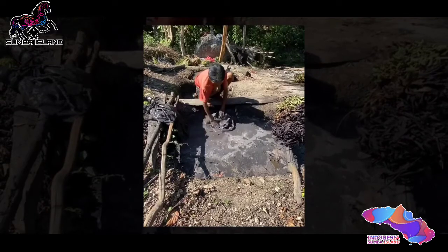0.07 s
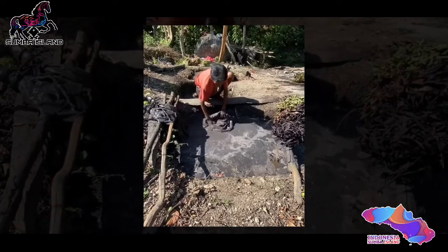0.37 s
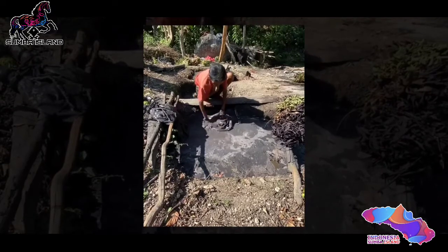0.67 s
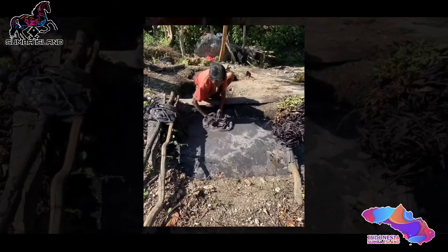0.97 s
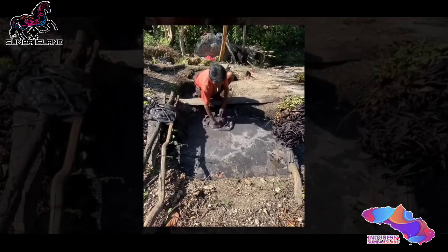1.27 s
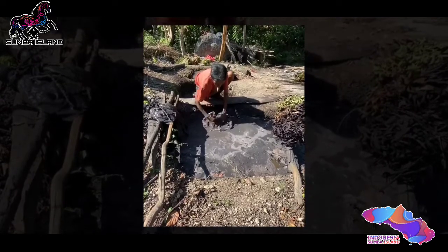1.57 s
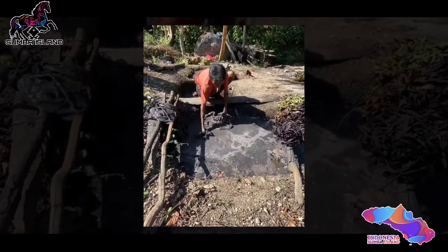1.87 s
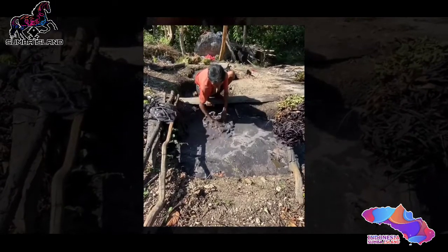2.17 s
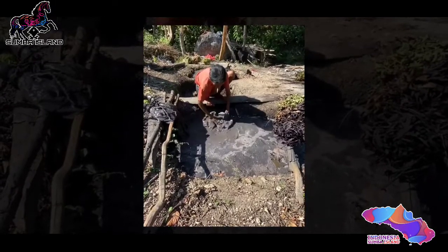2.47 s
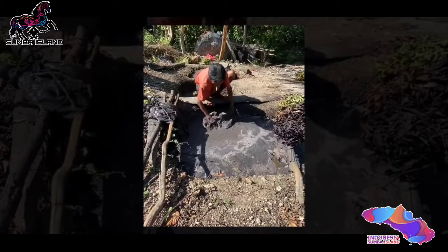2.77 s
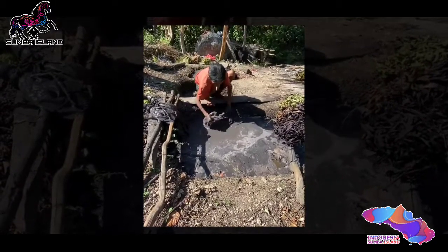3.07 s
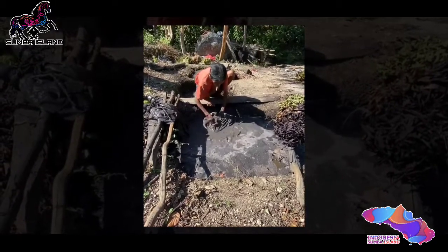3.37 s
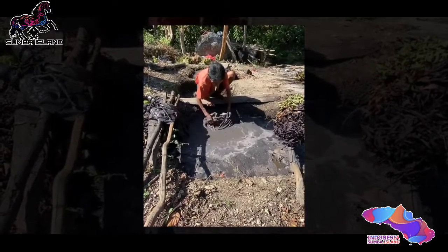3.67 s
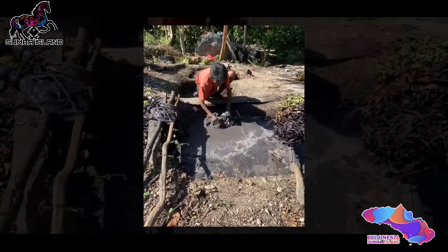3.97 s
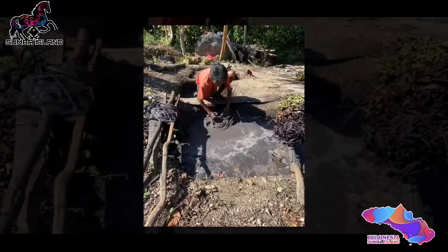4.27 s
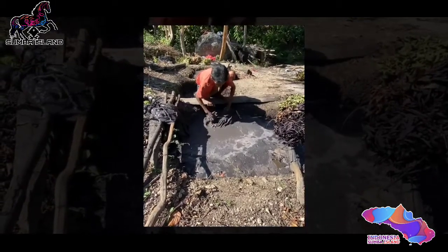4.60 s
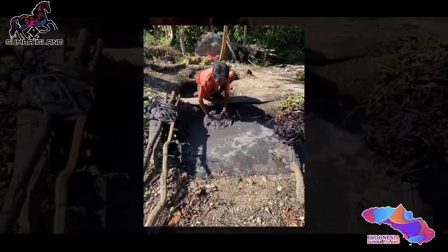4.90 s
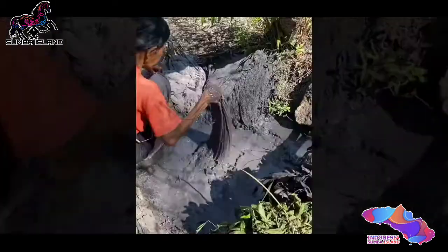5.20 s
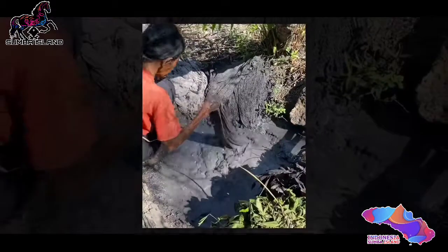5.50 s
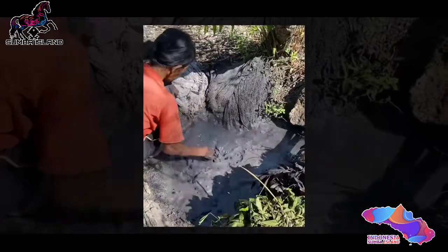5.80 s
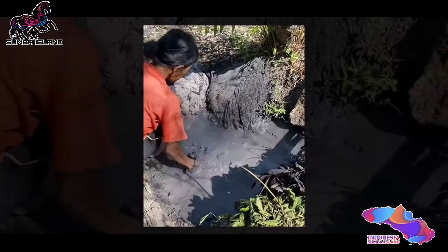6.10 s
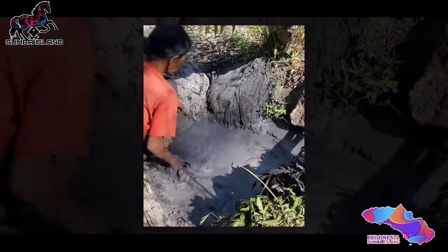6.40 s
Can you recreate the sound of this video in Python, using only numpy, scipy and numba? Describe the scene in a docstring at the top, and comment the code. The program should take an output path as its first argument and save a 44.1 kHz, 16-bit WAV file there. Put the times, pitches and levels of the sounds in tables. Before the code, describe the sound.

Soft, irregular squelching and trickling come from a short distance as hands squeeze yarn in muddy water, against a faint outdoor hush. Drops plink, a small air pocket gulps, and one flat, sharp splash stands out. After a lull with scattered drips, the kneading is suddenly right by the microphone, with heavier churning, splashes and low gulps as the yarn is dragged under.

```python
"""A hank of yarn is kneaded in a muddy pool outdoors, first a few metres off. Each squeeze frees
small bubbles and a fine spray; drops plink, wet strands slap, the banks add a short scatter.
At 2.2 s one air pocket gulps; at 3.2 s the hank smacks flat on the water.
From 5.3 s the kneading is close by: the arm pushes waves and big air pockets gulp as the yarn
is dragged under."""
import sys
import numpy as np
from scipy import signal
from scipy.fft import rfft, irfft
from scipy.io import wavfile
from scipy.ndimage import uniform_filter1d
from numba import njit

SR = 44100
rng = np.random.default_rng(int(sys.argv[2]) if len(sys.argv) > 2 else 0)


def output_pcm(signal):
    """Save a mono or channel-first signal as 16-bit PCM at the path in sys.argv[1].

    Samples are clipped to [-1, 1] before scaling.
    """
    pcm = np.clip(np.atleast_2d(signal).T, -1, 1) * 32767
    wavfile.write(sys.argv[1], SR, np.round(pcm).astype(np.int16))


N = 284445
TIME_S = np.arange(N) / SR
BINS_HZ = np.fft.rfftfreq(N, 1 / SR)
SIDE_SIGN = np.array([[1], [-1]])
CLOSE_S = 5.286

# Spectrum of a wet impact: freq_hz, gain_db
IMPACT_SPECTRUM = [(150, -22), (400, -9.5), (850, -6.5), (1400, 1.5), (3300, 5.5), (4700, -2.5),
                   (5600, 2.5), (8500, -6), (10500, -7.5), (15500, -18.5)]


def undb(db):
    """Decibels to gain."""
    return 10 ** (np.asarray(db) / 20)


def unit(x):
    """Scale to rms 1."""
    return x / np.sqrt(np.mean(x ** 2) + 1e-20)


def even(x, window_samples=2600):
    """Hold the running rms near 1."""
    return x / np.sqrt(uniform_filter1d(np.mean(x ** 2, axis=0), window_samples) + 1e-6 * np.mean(x ** 2))


def across(table, hz, column=1):
    """Interpolate a table column over log frequency."""
    rows = np.array(table)
    return np.interp(np.log(hz + 1), np.log(rows[:, 0]), rows[:, column])


def colour(x, spectrum):
    """Filter by rows of freq_hz, gain_db."""
    return irfft(rfft(x) * undb(across(spectrum, BINS_HZ)), N)


def swell(at_s, hold_s, rise_s, fall_s):
    """Exponential envelope: reaches 1 at at_s, holds, decays."""
    return np.exp(np.minimum(0, np.minimum((TIME_S - at_s) / rise_s, (at_s + hold_s - TIME_S) / fall_s)))


@njit
def ring(start_s, hz, size, cycles, skew_rad, rise, onset):
    """Bubbles: sines that swell, fall 60 dB over their cycles and go sharp by the fraction rise."""
    out = np.zeros((2, N))
    for k in range(len(start_s)):
        first, length, phase = int(start_s[k] * SR), int(cycles[k] / hz[k] * SR) + 2, 0.
        for i in range(max(0, -first), min(length, N - first)):
            age = i / length
            phase += 2 * np.pi * min(hz[k] * (1 + rise * age) / SR, .45)
            swing = size[k] * np.exp(-6.9 * age) * (1 - np.exp(-(age / onset) ** 2))
            out[0, first + i] += swing * np.sin(phase + skew_rad[k])
            out[1, first + i] += swing * np.sin(phase - skew_rad[k])
    return out


def cloud(per_s, low_hz, high_hz, cycles, spread_db, skew_rad, rise):
    """Steady swarm of tiny bubbles; cycles is the mean at 2 kHz, smaller bubbles ring for more."""
    when, pitch, strength, life, side = rng.random((int(per_s * N / SR), 5)).T
    hz = (np.sqrt(low_hz) + pitch * (np.sqrt(high_hz) - np.sqrt(low_hz))) ** 2
    size = undb(-spread_db * np.log(strength + 0.038)) * np.sqrt(hz)
    ring_cycles = cycles * (.5 + life) * np.sqrt(hz / 2000)
    return unit(ring(when * N / SR, hz, size, ring_cycles, skew_rad * (2 * side - 1), rise, 1 / 6))


def outdoors(level_db=-54.5, side_db=-3):
    """Faint open air and foliage, narrower in the bass."""
    # Ambient spectrum: freq_hz, gain_db
    air_spectrum = [(15, -45), (25, -23), (59, 1.5), (193, 0.5), (349, -4.5), (582, -6), (826, -5.5),
                    (1270, -11.5), (1710, -7.5), (2490, -12.5), (3930, -6), (4620, -15), (5280, -9.5),
                    (10600, -18), (15500, -23)]
    mid, side = colour(rng.standard_normal((2, N)), air_spectrum)
    side = colour(side, [(60, -2), (300, -6.5), (700, 6.5), (1600, 0.5), (2800, 3.5), (6000, 0)])
    return (mid + side * undb(side_db) * SIDE_SIGN) / np.std(mid) * undb(level_db)


def banks(x, wet_db, t60_s):
    """Muddy banks and bushes add a short, dull tail to x."""
    age_s = np.arange(9000) / SR
    tail = rng.standard_normal((2, len(age_s))) * undb(-60 * age_s / t60_s) * (age_s > .003)
    tail = signal.sosfilt(signal.butter(1, 6000, fs=SR, output="sos"), tail)
    tail /= np.sqrt(np.sum(tail ** 2, axis=1, keepdims=True))
    return x + undb(wet_db) * signal.fftconvolve(x, tail, axes=1)[:, :N]


def spatter(spray, gain_db=-59, follow=0.58, ref_db=-55):
    """Mud flecks tick on the surface, harder while the yarn sprays."""
    ticks = cloud(per_s=63, low_hz=1200, high_hz=11000, cycles=5.3, spread_db=3, skew_rad=0.81, rise=0.11)
    return colour(ticks, IMPACT_SPECTRUM) * undb(gain_db) * (spray / undb(ref_db)) ** follow


def waves(rise_s=0.041, fall_s=0.049):
    """Water pushed by the arm rumbles, heard only close by."""
    # Wave crests: peak_s, level_db
    crests = [(5.384, -21), (5.53, -26.5), (5.648, -25.5), (5.8, -28.5), (5.918, -25), (6.055, -36.5),
              (6.245, -29)]
    spectrum = [(15, -50), (30, -9.5), (60, 5), (110, -2), (200, -11.5), (350, -24.5), (900, -40)]
    mid, side = colour(rng.standard_normal((2, N)), spectrum)
    rumble = even(mid + side * SIDE_SIGN / 9, window_samples=1800)
    heave = np.max([swell(peak_s, 0, rise_s, fall_s) * undb(db) for peak_s, db in crests], axis=0)
    return rumble * heave * (TIME_S > CLOSE_S)


def gulps(gain_db=10, cycles=7., rise=0.42):
    """Big air pockets break loose and ring for a few slow swings."""
    # Air pockets: time_s, pitch_hz, relative_db
    pockets = [(2.242, 200, -28.5), (5.35, 164, -17.5), (5.368, 237, -15), (5.379, 87, -23),
               (5.382, 370, -15), (5.634, 61, -24), (5.67, 207, -18), (5.822, 177, -24), (5.904, 78, -24),
               (6.24, 109, -22), (6.411, 150, -22)]
    time_s, hz, db = np.transpose(pockets)
    start_s = time_s - 0.32 / hz
    return ring(start_s, hz, undb(db + gain_db), np.full(len(hz), cycles), np.zeros(len(hz)), rise, 1 / 8)


def drips(churn, per_s=14, low_hz=600, high_hz=4500, base_db=-41, spread_db=2.5, follow=0.44, ref_db=-48):
    """Faint random drips, louder with the churn: rows of time_s, pitch_hz, relative_db."""
    when, pitch, strength = rng.random((int(per_s * N / SR), 3)).T
    churn_db = 20 * np.log10(churn[(when * N).astype(int)])
    db = base_db + spread_db * (2 * strength - 1) + follow * (churn_db - ref_db)
    return np.transpose([when * N / SR, low_hz * (high_hz / low_hz) ** pitch, db])


def drops(churn, gain_db=18, rise=0.19, onset=0.3, splits=2, split_db=-5, scatter_s=0.00248):
    """Each drop traps a bubble that chirps upward and splits off weaker ones."""
    # Distinct drops: time_s, pitch_hz, relative_db
    plinks = [(.065, 2900, -36), (.184, 1840, -34), (.517, 820, -37), (.594, 1470, -33), (.63, 338, -37.5),
              (.676, 1950, -27.5), (.808, 3080, -21), (.909, 2490, -30), (.981, 1870, -35),
              (1.205, 458, -29.5), (1.465, 2680, -38.5), (1.972, 1085, -32), (2.078, 6330, -29),
              (2.112, 3930, -23.5), (2.13, 2800, -23.5), (2.246, 2470, -18), (2.301, 1430, -30),
              (2.393, 3110, -26), (2.709, 1720, -26.5), (2.836, 2750, -28.5), (2.929, 1370, -29),
              (3.068, 2830, -31), (3.114, 1480, -32), (3.194, 1820, -23), (4.21, 2580, -32),
              (4.281, 3030, -35), (4.314, 2290, -31.5), (4.486, 3700, -35), (4.67, 5940, -26.5),
              (4.697, 1610, -29.5), (4.768, 3090, -24), (4.785, 4030, -25), (4.816, 1430, -23.5),
              (4.841, 1690, -27.5), (5.452, 880, -17.5), (5.483, 2000, -18), (5.501, 1470, -15),
              (5.608, 1585, -14.5), (5.916, 2200, -25), (6.104, 1480, -23), (6.22, 1720, -32),
              (6.338, 1360, -26.5)]
    time_s, hz, db = np.vstack([plinks, drips(churn)]).T
    cycles = 17 * np.sqrt(hz / 2000)
    start_s = time_s - cycles / hz / 10
    size = undb(db + gain_db)
    lag, detune, skew = rng.standard_normal((len(hz), splits + 1, 3)).T
    out = ring(start_s, hz, size, cycles, 0.071 * skew[0], rise, onset)
    for k in range(1, splits + 1):
        split_s = start_s + scatter_s * lag[k]
        split_hz = hz * 2 ** (detune[k] / 3)
        out += ring(split_s, split_hz, size * undb(split_db), cycles, 0.14 * skew[k], rise, onset)
    return out


def slaps(swell_s=0.0023, gain_db=0.5, length=8192, lead_samples=700):
    """Wet strands hit the surface: a quick swell of tiny bursting bubbles."""
    # Slaps and squirts: peak_s, relative_db, decay_s, tilt_db_per_octave
    hits = [(.007, -31, 0.0039, -2), (0.403, -34, 0.0056, 2.5), (.561, -36, 0.0097, 0),
            (0.655, -35.5, 0.0031, 4), (0.753, -38.5, 0.0083, 6), (1.2, -37, 0.015, -6.5),
            (1.313, -37.5, 0.0055, -.5), (1.574, -39.5, 0.016, -5), (1.73, -26.5, 0.0016, 7.5),
            (1.839, -37.5, 0.0093, -3.5), (1.872, -38.5, 0.019, 2), (2.152, -31.5, 0.0065, -0.5),
            (2.182, -24, .0018, -2), (2.201, -25.5, .0043, -2), (2.213, -27, 0.0024, -2),
            (2.23, -34.5, 0.014, 5), (2.382, -45, .0018, -2.5), (2.493, -26, 0.0017, 1.5),
            (2.645, -30.5, 0.0075, 3), (3.526, -43, .0044, -8), (3.918, -35.5, 0.0012, -3.5),
            (3.932, -30, .0015, -5.5), (4.238, -44, 0.0041, 1), (4.697, -30.5, 0.0016, -5.5),
            (4.77, -32, .0064, 1.5), (4.877, -37.5, 0.013, 0.5), (4.93, -35.5, 0.0056, 1.5),
            (4.976, -33.5, 0.011, -4.5), (5.515, -23.5, 0.0032, 14.5), (5.626, -22.5, 0.014, 1.5),
            (5.825, -25.5, 0.0031, 2.5), (5.97, -31, 0.014, 3), (6.121, -29.5, 0.0026, 2),
            (6.326, -30, 0.0017, 4.5)]
    crackle = cloud(per_s=6000, low_hz=200, high_hz=15500, cycles=6, spread_db=3, skew_rad=.7, rise=.2)
    out = np.zeros((2, N + 2 * length))
    age_s = (np.arange(length) - lead_samples) / SR
    hz = np.fft.rfftfreq(length, 1 / SR)
    for peak_s, db, decay_s, tilt in hits:
        cut = int(rng.random() * (N - length))
        envelope = np.exp(np.minimum(age_s / swell_s, -age_s / decay_s))
        spectrum_db = across(IMPACT_SPECTRUM, hz) + tilt * np.log2(hz / 2000 + 0.037)
        burst = irfft(rfft(crackle[:, cut:cut + length] * envelope) * undb(spectrum_db))
        first = int(peak_s * SR) + length - lead_samples
        out[:, first:first + length] += unit(burst) * np.sqrt(np.mean(envelope ** 2)) * undb(db + gain_db)
    return out[:, length:length + N]


def plunge(at_s=3.218, level_db=-13, snap=7, width=0.46):
    """The hank smacks flat on the water: a snap in a burst of spray rings the trapped air."""
    # Trapped-air resonances: freq_hz, width_hz, gain_db
    modes = [(534, 53, 1), (840, 150, 9), (1160, 510, 8), (2020, 310, 6), (2550, 180, 4.5),
             (3250, 450, 6.5), (5370, 470, 5.5), (6800, 1400, 1.5), (9860, 810, 7.5), (11300, 630, 1),
             (14000, 2000, -21)]
    envelope = swell(at_s, hold_s=0, rise_s=0.003, fall_s=0.005)
    mid, side = rng.standard_normal((2, N)) * envelope
    mid[int(at_s * SR)] += snap
    response = sum(undb(db) / (1 + 2j * (BINS_HZ - hz) / width_hz) for hz, width_hz, db in modes)
    smack = irfft(rfft(mid + width * side * SIDE_SIGN) * response, N)
    smack = signal.sosfilt(signal.butter(4, 420, "high", fs=SR, output="sos"), smack)
    return unit(smack) * np.sqrt(np.mean(envelope ** 2)) * undb(level_db)


def stick_slip(depth_db=2.5, step_samples=500):
    """Strands give way in small jerks: a random gain that clusters the bubbling."""
    steps = np.repeat(rng.standard_normal(N // step_samples + 1), step_samples)
    return undb(depth_db * uniform_filter1d(steps, step_samples // 2)[:N])


def flow(press_s=.009, relax_s=0.045, drain_s=0.19, drain_db=-12):
    """Churn and spray envelopes: the hand presses, holds and lets go, then the yarn drains."""
    # Squeezes: start_s, hold_s, churn_db, spray_db
    squeezes = [(.055, 0.077, -46, -51), (0.272, .15, -49, -55), (.565, 0.17, -48.5, -55.5),
                (.82, .16, -55, -58.5), (1.195, 0.043, -50, -57), (1.315, 0.022, -53.5, -56),
                (1.41, .19, -56, -67.5), (1.735, 0.014, -66, -53), (1.845, 0.048, -49, -51),
                (1.94, 0.21, -52.5, -57), (2.154, 0.083, -36, -44), (2.3, 0.38, -46, -54.5),
                (2.58, 0.13, -40.5, -51.5), (2.818, .11, -47, -53.5), (2.98, 0.2, -55, -60),
                (3.189, 0.017, -45, -43.5), (3.525, 0.037, -52, -69), (3.69, 0.027, -62, -59.5),
                (4.135, 0.13, -60, -64.5), (4.669, 0.028, -52.5, -52), (4.768, 0.095, -46.5, -50),
                (4.94, 0.044, -43, -52.5), (5.294, 0.25, -33, -50.5), (5.45, 0.11, -30.5, -40.5),
                (5.608, 0.045, -52, -40.5), (5.7, 0.13, -45, -56), (5.808, 0.071, -44, -40.5),
                (5.958, .08, -36, -46), (6.084, 0.027, -41, -43), (6.15, .29, -41.5, -51.5)]
    churn, spray = undb(-63.5), undb(-81)  # constant seepage
    for start_s, hold_s, churn_db, spray_db in squeezes:
        grip = swell(start_s, hold_s, press_s, relax_s)
        drain = undb(drain_db) * swell(start_s, hold_s, press_s, drain_s)
        outflow = np.maximum(grip, drain)
        churn = np.maximum(churn, outflow * undb(churn_db))
        spray = np.maximum(spray, outflow * undb(spray_db))
    return churn, spray


def kneading(churn, spray):
    """Bubbles churn in the yarn while water squirts between its strands; far, then close."""
    # Spectra of far churn, close churn and spray: freq_hz, gain_db
    far_spectrum = [(120, -8), (300, -8), (500, -3), (700, -6.5), (930, -5.5), (1150, 1.5), (1600, 3.5),
                    (2300, -1), (3400, -2), (4800, -9.5), (5600, -3), (8000, -21.5), (15000, -20)]
    close_spectrum = [(120, -9), (420, 0.5), (600, 3.5), (800, 4.5), (1150, 1.5), (1600, 0.5), (2100, -0.5),
                      (2700, -11.5), (3500, -5.5), (6000, -20.5), (15000, -19)]
    spray_spectrum = [(2000, 3.5), (4500, 2), (5700, 2.5), (8500, -1), (10500, -1.5), (15500, -4)]
    jerks = stick_slip()
    swarm = cloud(per_s=2800, low_hz=197.6, high_hz=9010, cycles=17.2, spread_db=5, skew_rad=.18, rise=.23)
    mist = cloud(per_s=5000, low_hz=2000, high_hz=15000, cycles=10, spread_db=2.5, skew_rad=1.3, rise=.1)
    gush = cloud(per_s=4500, low_hz=192, high_hz=9170, cycles=15.2, spread_db=3.5, skew_rad=.23, rise=.29)
    squirt = even(colour(mist * jerks, spray_spectrum)) * spray
    far = even(colour(swarm * jerks, far_spectrum)) * churn * undb(2) + squirt * undb(5.5)
    close = even(colour(gush * jerks, close_spectrum)) * churn * undb(-0.2) + squirt * undb(3.5)
    return np.where(TIME_S < CLOSE_S, far, close)


def ports(x):
    """Two microphone ports hear each position with their own colour and phase."""
    # Port differences: freq_hz, left_minus_right_db, left_lead_rad
    far_response = [(60, -1, 0), (400, -8, 0), (700, -6, 1.4), (1150, -1, .5), (1700, -.5, .2),
                    (2700, -5, 1.1), (5700, -2, 0), (8500, .5, 1.3), (12000, 0, .4)]
    close_response = [(80, 0, 0), (350, -2, -.4), (800, -7, -.1), (1700, -1, .1), (3300, -4, .6),
                      (5700, 1, .6), (8500, 0, 1.4), (12000, 0, .8)]
    heard = []
    for response in (far_response, close_response):
        gain = undb(SIDE_SIGN / 2 * across(response, BINS_HZ))
        phase_rad = SIDE_SIGN / 2 * across(response, BINS_HZ, column=2)
        heard.append(irfft(rfft(x) * gain * np.exp(1j * phase_rad), N))
    return np.where(TIME_S < CLOSE_S, *heard)


def scene():
    """Pool and open air in stereo; the position jumps from far to close at CLOSE_S."""
    churn, spray = flow()
    water = kneading(churn, spray) + drops(churn) + slaps() + spatter(spray)
    splashes = banks(water, wet_db=-12, t60_s=0.094) + banks(plunge(), wet_db=-21, t60_s=0.092)
    return ports(splashes + gulps() + waves() + outdoors())


def record(dry, top_hz=15700):
    """The phone's steep low-pass."""
    return signal.sosfilt(signal.ellip(8, .2, 70, top_hz, fs=SR, output="sos"), dry)


dry = scene()
out = record(dry)
output_pcm(out)
```